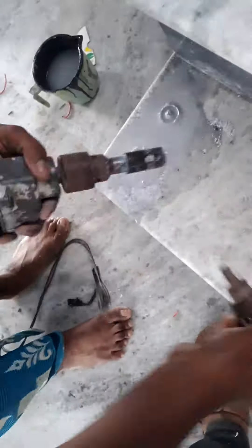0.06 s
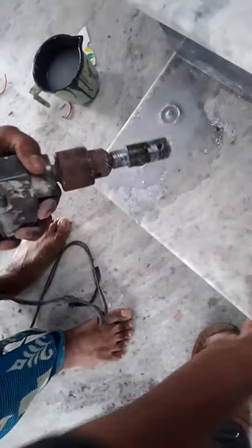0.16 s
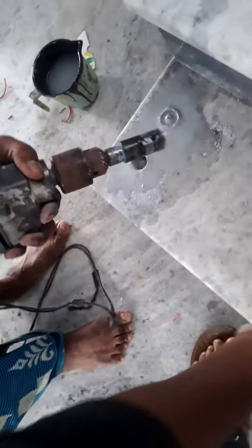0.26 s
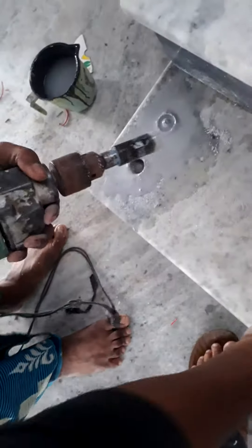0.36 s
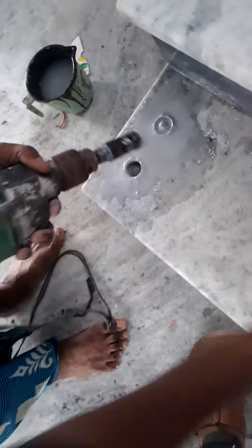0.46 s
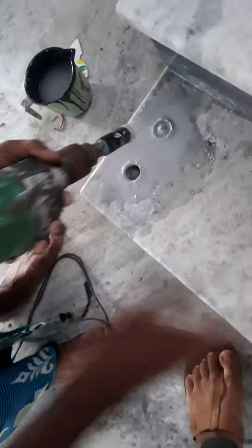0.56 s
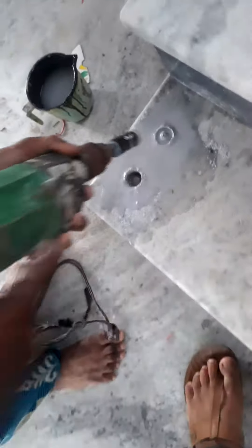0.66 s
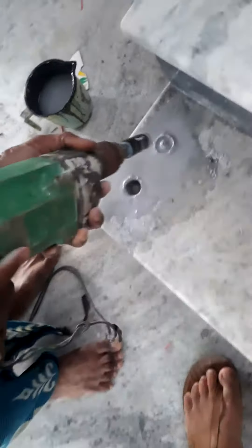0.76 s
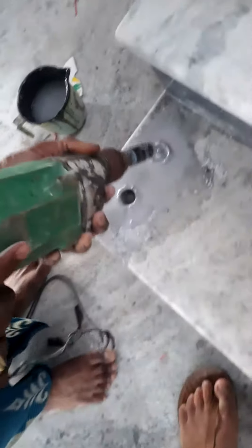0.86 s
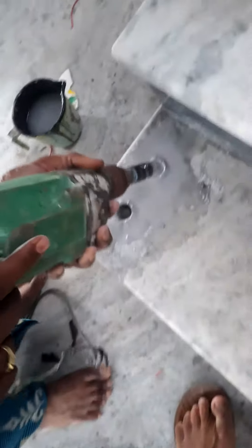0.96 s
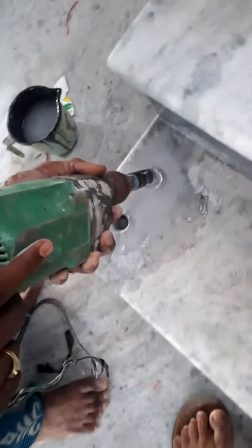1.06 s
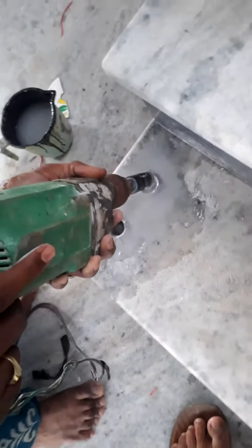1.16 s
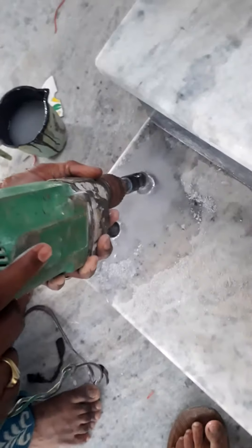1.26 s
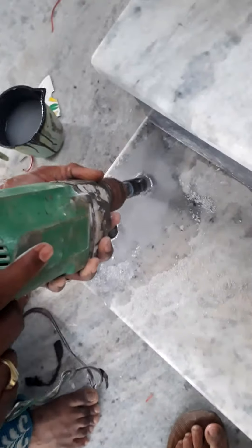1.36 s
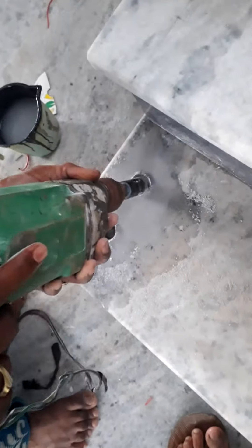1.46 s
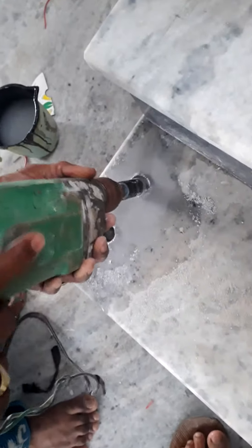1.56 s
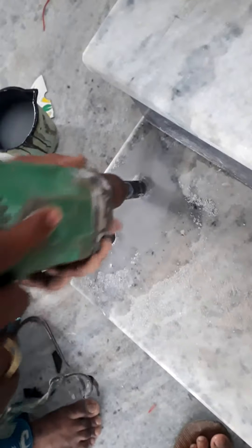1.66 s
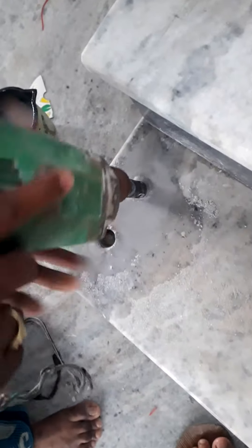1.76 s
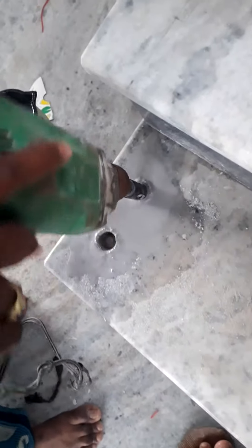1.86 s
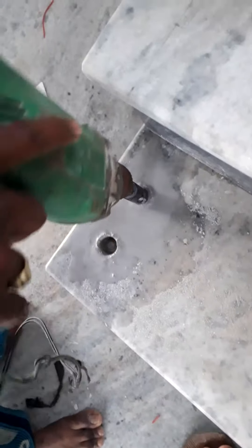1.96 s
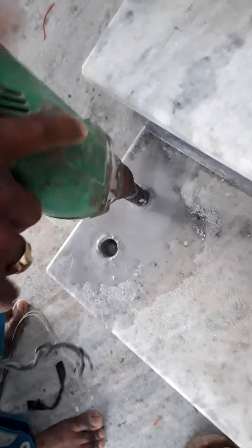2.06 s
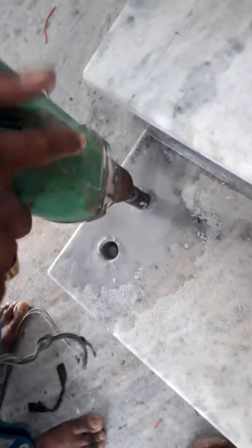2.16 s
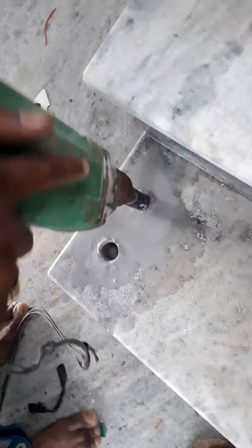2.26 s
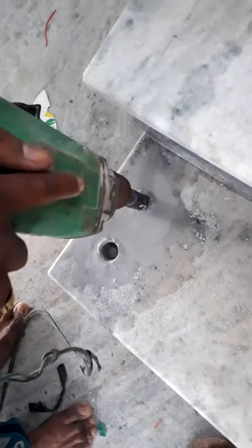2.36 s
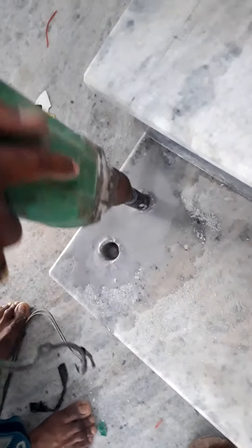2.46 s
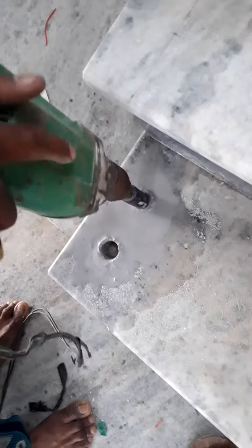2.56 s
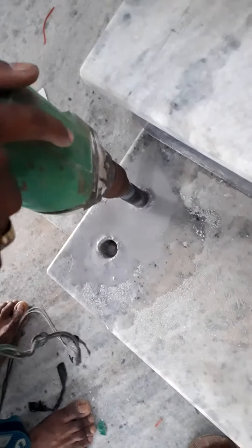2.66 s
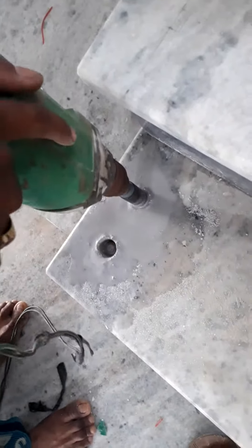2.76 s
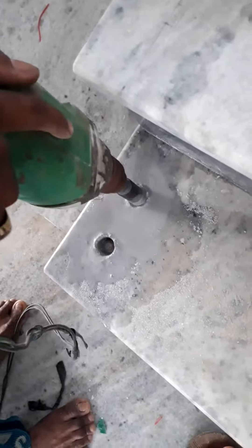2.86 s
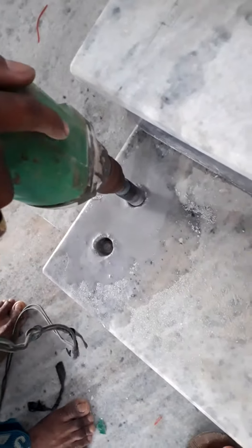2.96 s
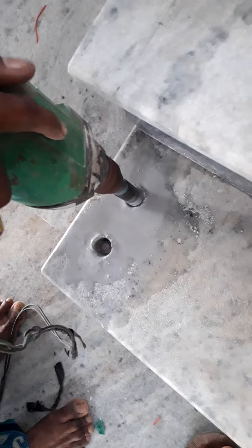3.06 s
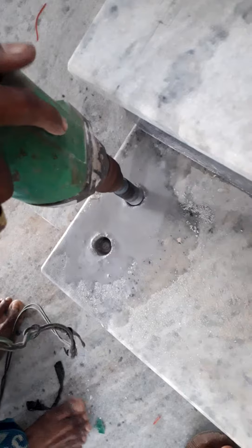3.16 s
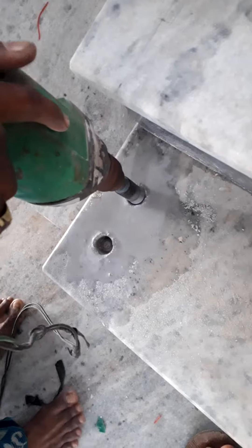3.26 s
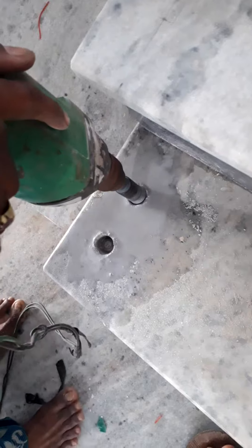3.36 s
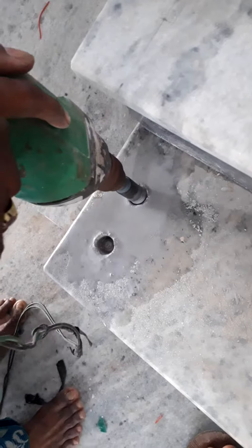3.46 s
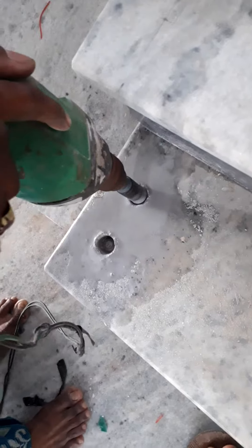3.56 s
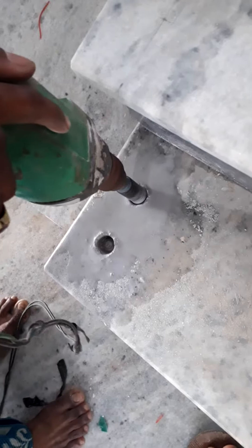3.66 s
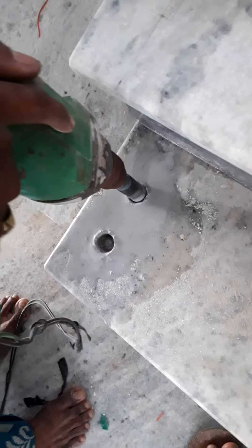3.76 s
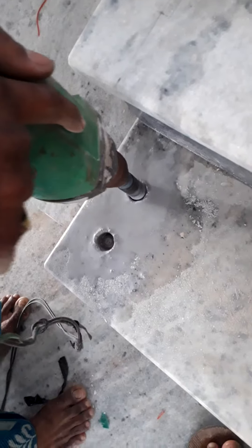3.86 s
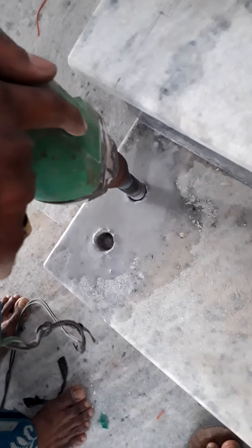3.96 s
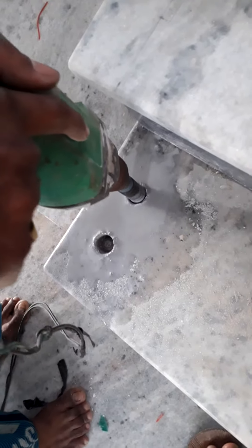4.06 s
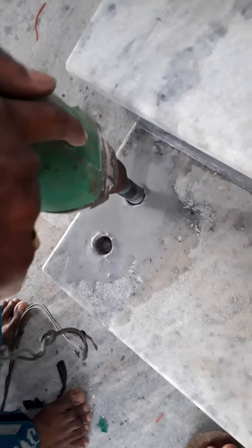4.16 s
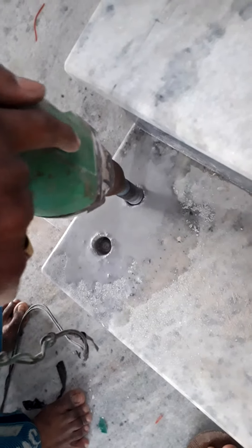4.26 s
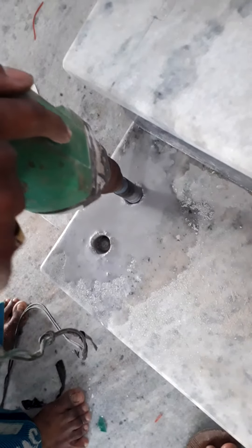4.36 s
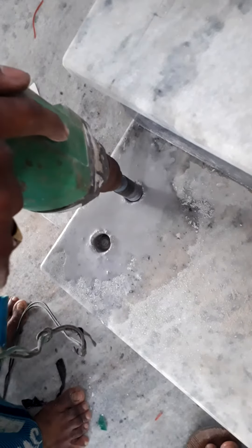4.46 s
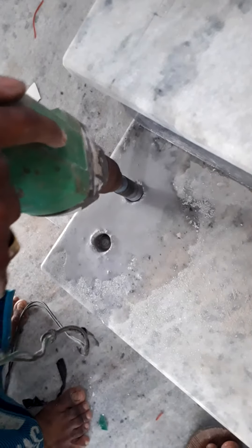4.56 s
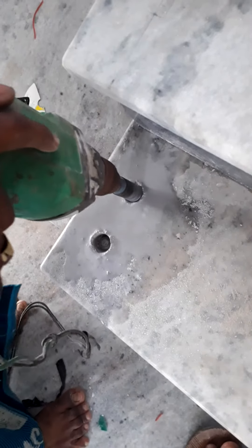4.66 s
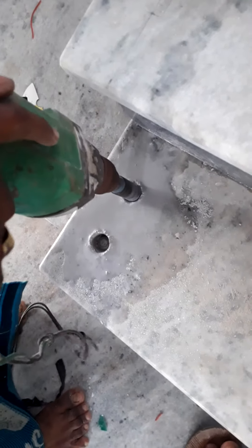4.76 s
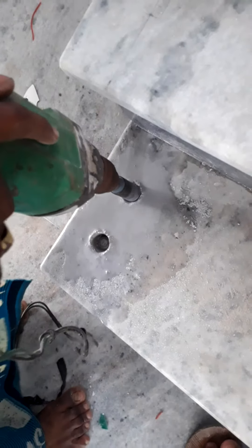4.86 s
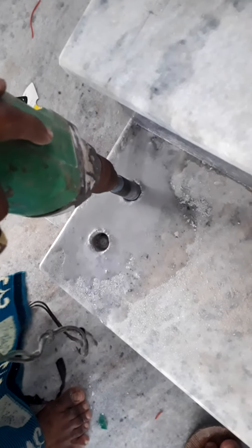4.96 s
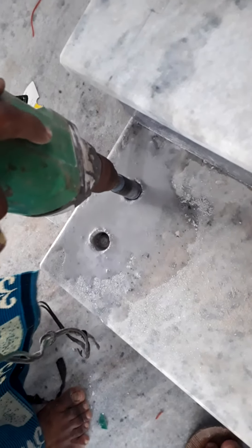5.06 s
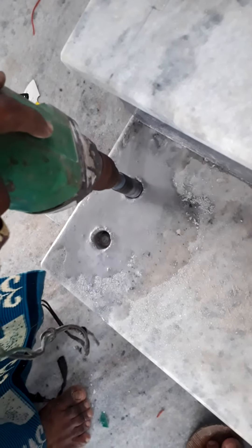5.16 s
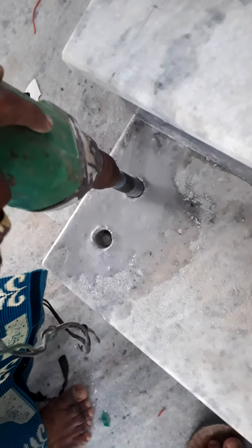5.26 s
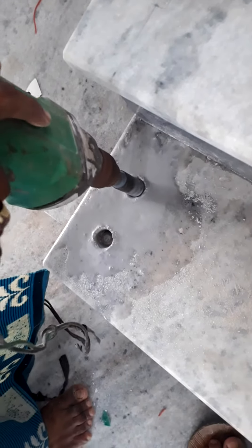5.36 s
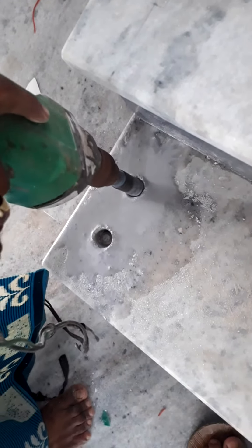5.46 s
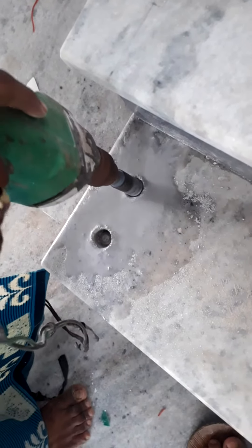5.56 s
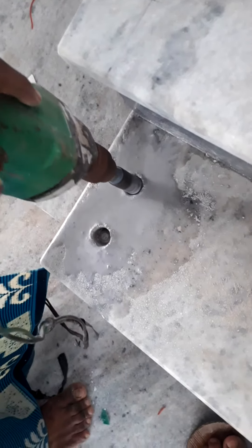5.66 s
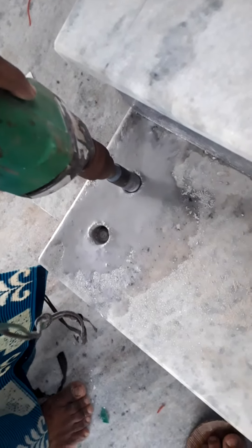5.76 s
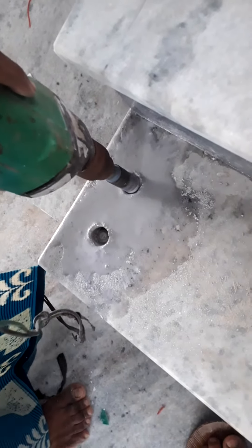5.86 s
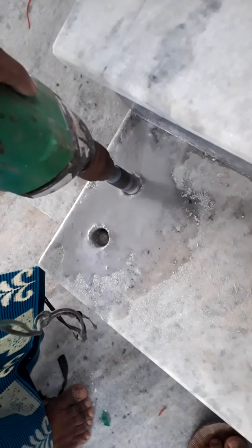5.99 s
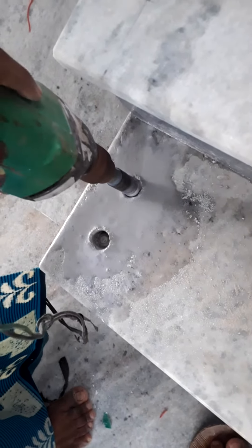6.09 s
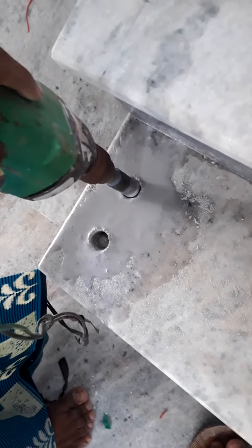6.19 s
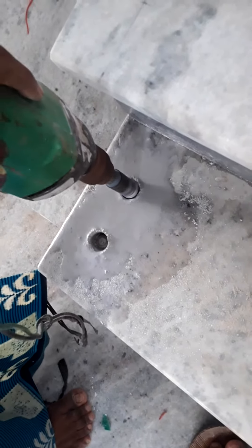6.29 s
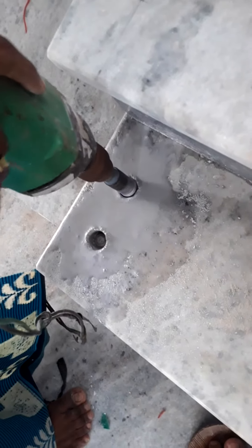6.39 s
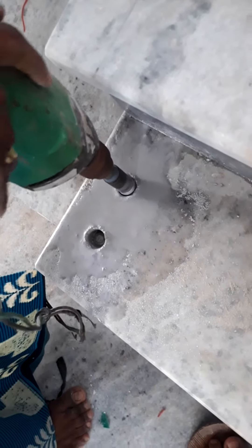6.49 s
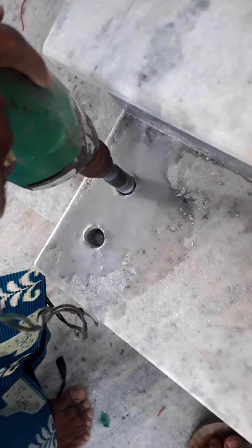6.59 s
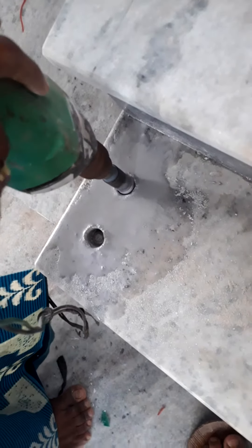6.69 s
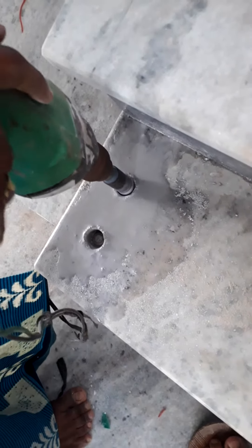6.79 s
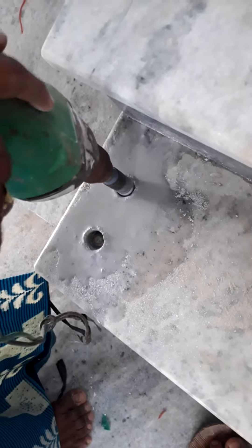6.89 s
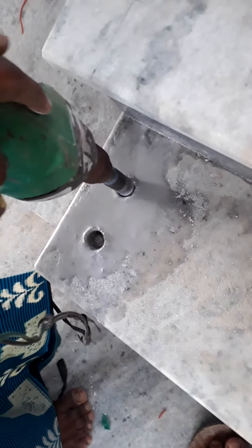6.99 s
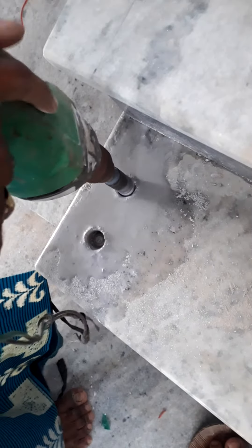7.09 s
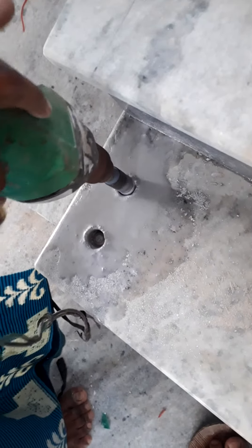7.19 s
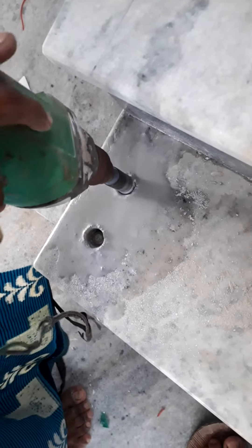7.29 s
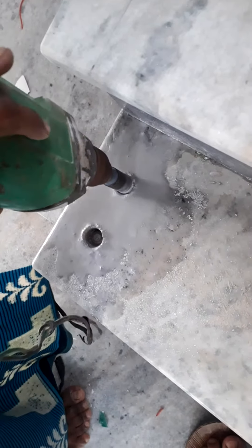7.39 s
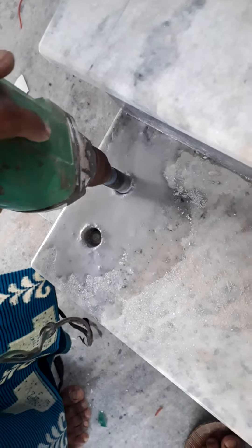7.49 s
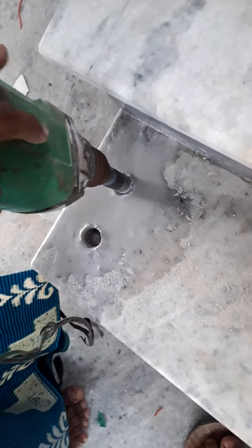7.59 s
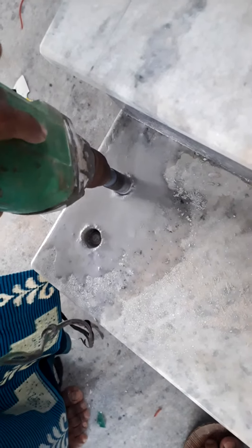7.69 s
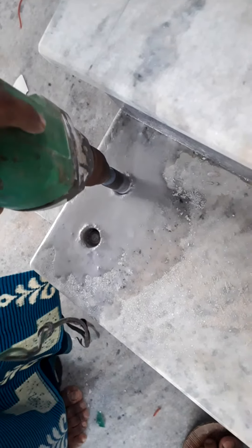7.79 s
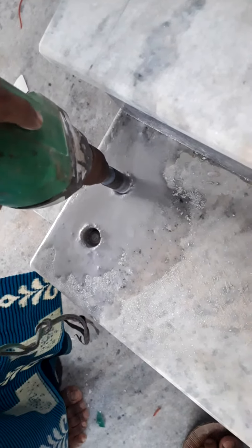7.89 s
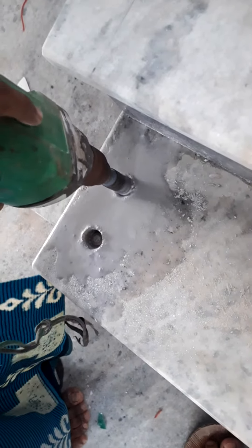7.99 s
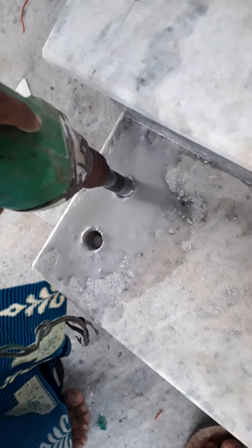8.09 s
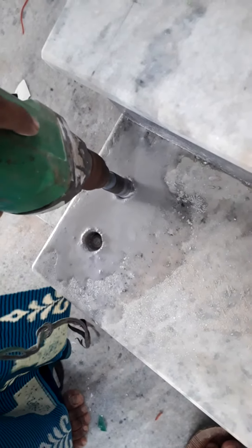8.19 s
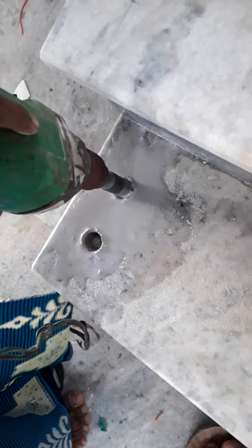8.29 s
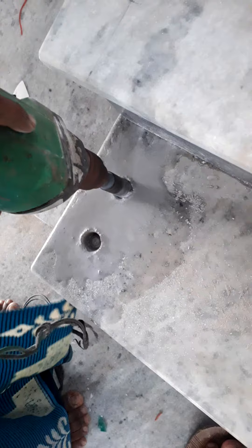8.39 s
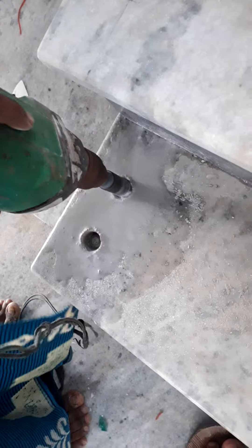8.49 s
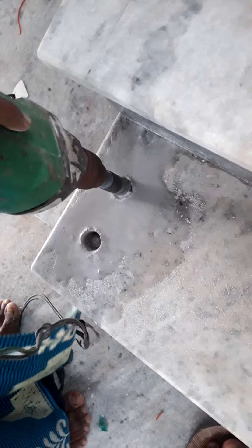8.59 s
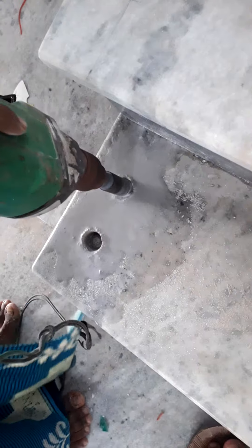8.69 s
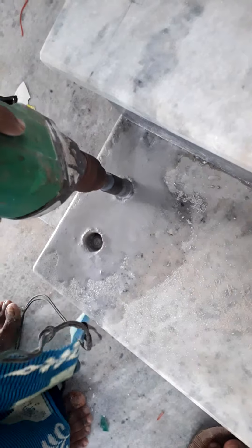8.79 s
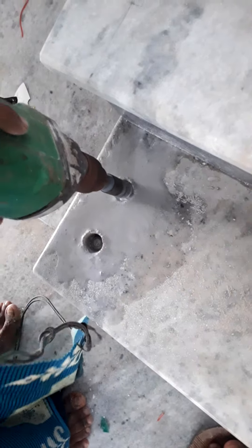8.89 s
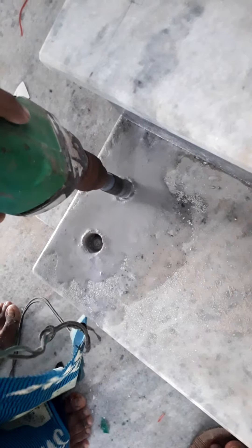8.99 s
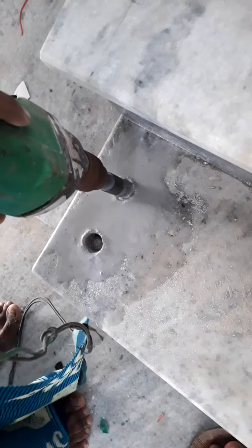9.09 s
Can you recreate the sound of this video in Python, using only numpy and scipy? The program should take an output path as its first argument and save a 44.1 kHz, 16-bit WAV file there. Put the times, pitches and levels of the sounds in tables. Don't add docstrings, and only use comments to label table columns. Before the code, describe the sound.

A close mono microphone in a hard-floored, echoing stone space. At 0 s an earlier echo is fading; a steel tool clinks at about 0.3 s and rings brightly around 0.55 s, with hands scuffing stone and a knock at 0.75 s. After a quieter gap, gritty taps begin at 1.4 s, with a heavy knock at 1.7 s and smaller scrapes until 2.6 s. The drill then surges up in half a second to a high, bright gear whine with roaring housing and hissing brushes. By 4 s its pitch sags under load and the hollow bit chatters rapidly against stone, metallic and rough. Gritty binding pulses and short squeals come at 4.7-5.7 s. The whine wavers, dipping lowest near 6.7 s, while irregular rim catches continue. Stronger squeals and grinding return from 8.6 s, and the drill is still boring at the end, about 9.1 s.

```python
import sys
import numpy as np
from scipy import signal
from scipy.fft import rfft, irfft, next_fast_len
from scipy.io import wavfile
from scipy.ndimage import uniform_filter1d, map_coordinates

SR = 44100
rng = np.random.default_rng(int(sys.argv[2]) if len(sys.argv) > 2 else 0)


def ratio(d):
    e = np.asarray(d, float) / 20
    return 10 ** e


def wav_record(signal):
    frames = np.transpose(np.atleast_2d(signal))
    bounded = np.clip(frames, -1, 1)
    quanta = np.round(bounded * 32767).astype(np.int16)
    wavfile.write(sys.argv[1], SR, quanta)


N = 403074


def unit(x):
    return x / np.sqrt(np.mean(x ** 2) + 1e-20)


def along(points, hz):
    f, v = np.transpose(points)
    return np.interp(np.log(hz + 1), np.log(f + 1), v)


def curves(rows):
    s, *cols = np.transpose(rows)
    return [np.interp(np.arange(N) / SR, s, c) for c in cols]


def wobble(rate):
    knots = rng.standard_normal(int(N * rate / SR) + 4)
    return map_coordinates(knots, [np.arange(N) * rate / SR])


def filtered(x, response):
    m = next_fast_len(len(x) + 8192)
    return irfft(rfft(x, m) * response(np.fft.rfftfreq(m, 1 / SR)), m)[:len(x)]


def modes(rows):
    def response(f):
        total = 0
        for k, (c, w, db) in enumerate(rows):
            total = total + (-1) ** k * ratio(db) * 1j * f * w / (c * c - f * f + 1j * f * w)
        return total
    return response


def highpass(f, hz):
    return (1j * f / (hz + 1j * f)) ** 2


def hiss(spectrum, gate=1):
    return unit(filtered(gate * rng.standard_normal(N), lambda hz: ratio(along(spectrum, hz))))


# frequency in Hz, density in dB per Hz.
ECHO_SPECTRUM = [(180, -54), (300, -10), (412, -14), (448, -17), (652, -6), (962, -2), (1320, -3),
                 (1770, -2), (5000, -16.5), (6500, -29), (11000, -120)]
DUST_SPECTRUM = [(2060, -30), (3500, -5), (4980, 5.5), (5870, -2), (7900, 5), (10400, -14), (13000, -8),
                 (15800, -9)]
AIR_SPECTRUM = [(12, -27), (20, -6), (49, -21), (130, -4.5), (203, -9.5), (524, -18), (1650, -20),
                (5470, -30), (6650, -29), (10700, -40), (15800, -34)]
# middle in seconds, half length in seconds, low
# level in dB, dust level in dB.
RUBS = [
    (0.647, 0.28, -49.5, -57),
    (1.685, 0.022, -50, -68),
    (1.777, 0.24, -56, -61),
    (2.321, 0.26, -55, -53.5),
]
ECHO_DB, ECHO_DUST_DB, ECHO_T60_S, AIR_DB = -35.5, -51, 1.87, -58.5


def background():
    t = np.arange(N) / SR
    fade = ratio(-60 * t / ECHO_T60_S)
    low, high = ratio(ECHO_DB) * fade, ratio(ECHO_DUST_DB) * fade
    for s, half_s, low_db, dust_db in RUBS:
        stroke = np.exp(-((t - s) / half_s) ** 2)
        low = low + ratio(low_db) * stroke
        high = high + ratio(dust_db) * stroke
    scuff = low * ratio(1.5 * wobble(24.5)) * hiss(ECHO_SPECTRUM)
    scuff += high * ratio(1.6 * wobble(24.4)) * hiss(DUST_SPECTRUM)
    return scuff + ratio(AIR_DB) * hiss(AIR_SPECTRUM)


def ringing(rows, t):
    out = 0
    for hz, db, t60_s in rows:
        out = out + ratio(db + rng.normal(0, 0.46) - 60 * t / t60_s) * np.sin(2 * np.pi * hz * t)
    return out * (1 - np.exp(-t / .0005))


# start in seconds, low ring in dB, high ring in dB, crack in dB, crack in Hz.
CLINKS = [
    (.3027, -70, -33, -18, 5260),
    (.4788, -43, -48, -17, 2020),
    (.4983, -50, -52, -20, 2000),
    (.5492, -16, -36, -7.5, 2100),
    (.5896, -18, -38, -19, 1670),
]
# frequency in Hz, level in dB, t60 in seconds.
STEEL_LOW = [(6532, -4.5, 0.31), (6510, -1.5, 0.2), (6512, -15.5, 0.97), (1640, -11, 0.091),
             (13270, -40, .4), (13240, -40, .3)]
STEEL_HIGH = [(11500, -7, 0.32), (11585, -12, 0.22), (15030, -10, 0.25), (15090, -14, 0.2)]


def clinks():
    rings, cracks, t = np.zeros(N), np.zeros(N), np.arange(SR) / SR
    for s, low_db, high_db, crack_db, hz in CLINKS:
        at = slice(round(s * SR), round(s * SR) + SR)
        burst = ratio(-60 * t / 0.051) * rng.standard_normal(SR)
        crack = filtered(burst, modes([(hz, 900, 8), (2600, 2600, -2), (8000, 6000, -4)]))
        cracks[at] += ratio(crack_db) * filtered(crack, lambda f: highpass(f, 850))
        rings[at] += ratio(low_db) * ringing(STEEL_LOW, t) + ratio(high_db) * ringing(STEEL_HIGH, t)
    return rings, cracks


# start in seconds, peak in dB, knock in Hz, scrape in dB.
TAPS = [(0.335, -23, 1840, -14), (0.357, -23.5, 2030, -7), (0.421, -36, 1040, -10), (0.751, -14, 836, -31),
        (1.433, -17.5, 894, -8.5), (1.445, -24, 1650, -10), (1.52, -32.5, 900, 0.5), (1.702, -7, 1504, -7),
        (1.711, -16, 1020, -6), (1.721, -13.5, 1150, -9), (1.872, -24.5, 820, -2), (1.904, -33, 993, -13),
        (2.037, -30, 1710, 0), (2.049, -27.5, 3050, -1), (2.135, -25.5, 836, -9), (2.186, -32, 713, -6),
        (2.265, -28, 800, -5), (2.329, -18.5, 760, -5), (2.376, -27, 714, -3.5), (2.45, -27.5, 720, -5.5),
        (2.536, -23, 760, -10), (2.613, -27, 756, -7)]
KNOCK_DB, KNOCK_T60_S, THUD_DB = -9.5, 0.043, -30.5
HEAVY_S, HEAVY_DB, HUM_T60_S = 1.702, -46.5, 1.6


def taps():
    noisy, dull, t = np.zeros(N), np.zeros(N), np.arange(SR // 4) / SR

    def slab(f):
        return modes([(283, 30, THUD_DB + 27)])(f) + modes([(800, 450, THUD_DB + 33)])(f) ** 2

    for s, db, hz, scrape_db in TAPS:
        at = slice(round(s * SR), round(s * SR) + len(t))
        envelope = ratio(-60 * t / 0.038) * (1 - np.exp(-t / 0.0007))
        burst = envelope * rng.standard_normal((3, len(t)))
        knock = ratio(KNOCK_DB - 60 * t / KNOCK_T60_S) * np.sin(2 * np.pi * hz * t)
        knock *= 1 + 0.42 * filtered(burst[0], modes([(200, 540, 14.0)]))
        scrape = filtered(burst[1], modes([(1750, 340, 4.5), (3340, 1250, 3.0), (7150, 13000, -9.0)]))
        thud = ratio(min(scrape_db + 14, 0)) * filtered(burst[2], slab)
        noisy[at] += ratio(db) * (thud + ratio(scrape_db + 5.5) * scrape)
        dull[at] += ratio(db) * knock
    t = np.arange(SR * 3 // 4) / SR
    hum = filtered(rng.standard_normal(len(t)), lambda f: modes([(260, 260, 0)])(f) ** 2)
    noisy[round(HEAVY_S * SR):][:len(t)] += ratio(HEAVY_DB - 60 * t / HUM_T60_S) * unit(hum)
    return noisy, dull


# frequency in Hz, t60 in seconds.
YARD = [(300, 1.08), (1500, 1.44), (5000, 0.8), (12000, 0.28)]


def yard(x, pieces):
    out, step = np.zeros(N + 2 * SR), len(x) // pieces
    for i in range(0, len(x) - step + 1, step):
        hz, t, z = signal.stft(rng.standard_normal(SR), SR, nperseg=256)
        decay = ratio(-60 * t / along(YARD, hz)[:, None])
        tail = signal.istft(z * decay, SR, nperseg=256)[1]
        wet = signal.fftconvolve(x[i:i + step], tail / np.linalg.norm(tail))
        out[i + 400:][:len(wet)] += wet
    return out[:N]


def switched(s):
    return np.clip((np.arange(N) / SR - s) / 0.0068, 0, 1)


# time in seconds, pinion mesh in Hz.
DRIVE = [(3.1, 2563), (3.58, 2528), (4.0, 2332), (4.27, 2308), (4.55, 2360), (5.0, 2414), (5.3, 2408),
         (5.9, 2322), (6.05, 2288), (6.4, 2244), (6.65, 2178), (6.95, 2205), (7.3, 2335), (7.62, 2290),
         (8.12, 2368), (8.58, 2392), (8.85, 2303), (9.14, 2360)]
START_S, LOADED_HZ, FREE_HZ = 2.6, 2330, 2560
SURGE, SURGE_S, SETTLE_S, INERTIA_S = .35, .05, .19, 0.12


def pinion_speed():
    t = np.arange(N) / SR
    since = np.maximum(t - START_S, 0)
    lag = SURGE * np.exp(-since / SURGE_S) + (1 - SURGE) * np.exp(-since / SETTLE_S)
    mesh_hz = uniform_filter1d(curves(DRIVE)[0], size=int(INERTIA_S * SR))
    mesh_hz = mesh_hz * (1.006 - lag - .006 * (t > 4))
    free = np.clip((mesh_hz - LOADED_HZ) / (FREE_HZ - LOADED_HZ), 0, 1) ** 0.097
    return mesh_hz, free * np.clip((4.1 - t) / 0.39, 0, 1)


def gear_line(turns, k, db, flicker_db):
    phase = k * turns + 0.076 * wobble(30)
    return ratio(db + flicker_db * wobble(22)) * np.sqrt(2) * np.sin(2 * np.pi * phase)


# multiple of mesh, level in dB.
SPIN_UP = [(1, -20), (12 / 7, -19), (2, -26), (3, -21), (6 / 11, -25), (14 / 11, -29)]
# frequency in Hz, width in Hz, level in dB.
GEARBOX = [(900, 450, 0), (1690, 260, 2), (2200, 200, 2), (3100, 550, 1), (4300, 500, -1), (5300, 800, -2),
           (6830, 260, 1)]


def spin_up(turns):
    t = np.arange(N) / SR
    torque = np.clip((3.15 - t) / .3, 0, 1) * np.clip((t - 2.638) / .018, 0, 1)
    torque = torque * (1 + .45 * wobble(600))
    lines = sum(gear_line(turns, k, db + 2.5 * wobble(50), 2) for k, db in SPIN_UP)
    return filtered(torque * lines, lambda f: .12 + sum(modes([row])(f) ** 2 for row in GEARBOX))


# time in seconds, mesh in dB, second stage in dB, fourth overtone in dB.
TEETH = [(2.9, -31, -27, -52), (3.14, -17, -22, -58), (3.28, -28, -26, -58), (3.42, -19.5, -19.5, -55),
         (3.53, -29, -30, -54), (3.62, -19, -25, -57), (3.8, -24, -33, -53), (4.1, -12.5, -32, -46),
         (4.22, -17.5, -23.5, -43), (4.55, -23, -36, -48), (5.35, -30, -39, -50), (5.5, -19.5, -39, -53),
         (5.7, -28, -31, -52), (5.86, -20.5, -40, -47), (6.3, -29.5, -38, -34.5), (6.8, -21.5, -36, -32),
         (7.4, -19.5, -34.5, -48), (8.2, -26, -37, -60), (8.5, -21.5, -42, -53), (8.8, -28, -41, -52)]
# time in seconds, rim bite in dB, rasp in dB, bit ring in Hz.
CUT = [(2.62, -40, -17, 1740), (2.7, -26, 3.5, 1700), (3.05, -27, 4.5, 1750), (3.7, -27, -0.5, 1760),
       (4.12, -16, 0, 1810), (4.4, -17, -1, 1741), (4.75, -17, 2, 1750), (5.18, -24, 4, 1753),
       (5.82, -19, 0, 1695), (5.95, -16, -0.5, 1670), (6.1, -26, -2, 1720), (6.7, -20, -3, 1773),
       (7.1, -22.5, -2, 1743), (7.68, -27, 0, 1741), (8.38, -19.5, -0.5, 1852), (8.56, -20, 0.5, 1758),
       (8.72, -23, 2.5, 1699), (9.14, -19, 1, 1764)]
# multiple of mesh, level in dB.
MESH_DB = [(5, -48), (6, -50)]
# order, level in dB.
ROTOR_DB = [(12, -35), (22, -40), (23, -39), (24, -39), (25, -45), (26, -45), (27, -46), (30, -57),
            (33, -53), (37, -53), (38, -56), (39, -52)]
# multiple of mesh, dB re the
STAGE_DB = [(9 / 11, -16), (8 / 7, -7), (14 / 11, 3), (17 / 11, -5)]
PINION, STAGE = 7, 3 / 11
SECOND_DB, THIRD_DB, THIRD_FREE_DB = -33, -30, 7
STAGE_LINE_DB, STAGE_FREE_DB, STAGE_FADE_S = -38, 10.5, 0.85
UNBALANCE_DB, UNBALANCE_FREE_DB = -57.5, 10.5
CONTACT_S = 3.3
SHAKEN = -1.1
BITE_IN_DB, BITE_IN_S = 6, .9
SAG_HZ, SAG_DB = 2280, -22.5


def gears():
    t = np.arange(N) / SR
    mesh_hz, free = pinion_speed()
    mesh_db, second_db, fourth_db = curves(TEETH)
    turns = np.cumsum(mesh_hz * (1 + 0.000968 * wobble(40))) / SR

    def line(k, db, flicker_db):
        return gear_line(turns, k, db, flicker_db)

    slow_db = np.minimum(42 * np.log10(mesh_hz / 2200), 0)
    speed_db = np.minimum(90 * np.log10(mesh_hz / 2300), 0)
    unseated_db = -6 * np.clip((3.09 - t) / .06, 0, 1)
    out = line(1, mesh_db + slow_db + unseated_db, 1.9 + 3 * (t < 3.08))
    third_db = THIRD_DB + THIRD_FREE_DB * free + 3.4 * slow_db + unseated_db
    out += line(3, third_db + 0.67 * wobble(4.5) + (1 + 2 * free) * wobble(150), 2.3)
    out += line(2 * STAGE, second_db + slow_db, 2.7)
    out += line(4, fourth_db + slow_db, 2.4)
    out += line(STAGE, -36.5 + speed_db, 0.6)
    out += line(2, SECOND_DB - 3 * (t < 6.2) + speed_db + 1.5 * wobble(3), 2)
    unbalance_db = UNBALANCE_DB + UNBALANCE_FREE_DB * free + slow_db
    out += line(1 / PINION, unbalance_db + 0.77 * wobble(1.9), 3.6)
    out += np.clip((SAG_HZ - mesh_hz) / 80, 0, 1) * (t > CONTACT_S) * line(3 * STAGE, SAG_DB, 2.2)

    pressed_db = -9 * np.clip((3.95 - t) / 0.34, 0, 1) + SHAKEN * (curves(CUT)[1] + 2) * (t > CONTACT_S)
    pressed_db += BITE_IN_DB * np.exp(-np.abs(t - 4) / BITE_IN_S) * (t > 3.8)
    for k, db in MESH_DB:
        out += line(k, db + speed_db + pressed_db + 2 * wobble(2.5), 2.5)
    for k, db in ROTOR_DB:
        out += line(k / PINION, db + speed_db + (k > 25) * pressed_db + 2 * wobble(2.5), 2.5)

    stage_db = STAGE_LINE_DB + STAGE_FREE_DB * np.exp(-np.maximum(t - CONTACT_S, 0) / STAGE_FADE_S)
    stage_db = uniform_filter1d(stage_db + 3.9 * slow_db + 0.77 * wobble(3.3), size=SR)
    for k, db in STAGE_DB:
        out += line(k, stage_db + db + speed_db, 0.41)
    return out + spin_up(turns), turns, free


# frequency in Hz, density in dB per Hz.
HOUSING = [(18, -82), (30, -43.5), (490, -19.5), (598, -9.5), (798, -15.5), (912, -10), (1140, -12.5),
           (1770, -1.5), (2020, -4.5), (2260, -6), (2700, -12.5), (3370, -7.5), (6000, -21.5), (7800, -50),
           (13200, -120)]
BRUSH = [(2650, -25), (4500, -39), (4600, -4), (5090, -2), (6210, -8), (7160, 0.5), (7340, 2), (7710, 5.5),
         (9180, -20.5), (10500, -56), (13600, -52), (22000, -120)]
# frequency in Hz, width in Hz, dB over the rest.
SHELL = [(697, 47, 11), (960, 90, 10.5), (345, 93, -8.5), (2940, 64, -13)]
HOUSING_DB, HOUSING_FREE_DB, HOUSING_FOLLOWS = -26, -0.5, -0.053
KICK_DB, KICK_S = 3.5, 0.99
BRUSH_DB, BRUSH_FREE_DB, BRUSH_FOLLOWS = -22.5, 6.5, 0.68


def motor(turns, free):
    t = np.arange(N) / SR
    since = np.maximum(t - START_S, 0)
    rasp_db = curves(CUT)[1]
    housing_db = HOUSING_DB + HOUSING_FREE_DB * free + KICK_DB * np.exp(-since / KICK_S)
    housing_db += HOUSING_FOLLOWS * np.maximum(rasp_db, -6)
    brush_db = BRUSH_DB + BRUSH_FOLLOWS * rasp_db
    brush_db += BRUSH_FREE_DB * np.maximum(free, np.exp(-since / 0.88))
    shell = modes(SHELL)
    body = unit(filtered(hiss(HOUSING, ratio(1.02 * wobble(60))), lambda hz: 1 + np.abs(shell(hz))))
    spark = 1 + 0.26 * np.sin(2 * np.pi * turns / PINION)
    spark *= 1 + 0.16 * np.sin(2 * np.pi * 100 * t)
    roar = ratio(housing_db + 4.5 + wobble(12)) * body
    return roar + ratio(brush_db - 5.5 + 0.81 * wobble(15)) * hiss(BRUSH, spark)


def squeak(hz, spread_hz, wander_hz):
    narrow = filtered(rng.standard_normal(N), lambda f: 1 / (1 + (f / spread_hz) ** 2))
    turns = np.cumsum(hz + wander_hz * wobble(50)) / SR
    return unit((1.8 + unit(narrow)) * np.sin(2 * np.pi * turns))


CHUCK, SEGMENTS = 3 / 11 / 38, 5
TICK_SCATTER_DB, TICK_SPREAD = 2.5, .022


def chatter(turns, ring_hz):
    passes = SEGMENTS * turns * CHUCK + .22 * wobble(25)
    size, pitch = rng.standard_normal((1000, 2))[np.abs(passes).astype(int)].T
    tick = .15 + np.sin(np.pi * passes) ** 2
    tick *= ratio(TICK_SCATTER_DB * size + 1.8 * wobble(11))
    return unit(tick * squeak(ring_hz * (1 + TICK_SPREAD * pitch), 80, 15))


# start in seconds, length in seconds, level in dB, from Hz, to Hz.
BENDS = [
    (5.06, 1.2, -28.5, 1289, 1500),
    (8.581, .8, -23, 1470, 1334),
]
BEND_EDGE_S = 0.14


def shank():
    out, t = np.zeros(N), np.arange(N) / SR
    for s, length_s, db, from_hz, to_hz in BENDS:
        end_s = s + length_s
        held = np.clip(np.minimum(t - s, end_s - t) / BEND_EDGE_S, 0, 1)
        slide_hz = np.interp(t, [s, end_s], [from_hz, to_hz])
        out += held * ratio(db + 0.85 * wobble(45)) * squeak(slide_hz, 110, 39.95)
    return out


# time in seconds, peak in dB, ring in Hz.
BITES = [(4.183, -11, 1730.0), (4.212, -7, 1800), (4.224, -9, 1750.0), (4.247, -2, 1750),
         (4.269, -10, 1700), (4.285, -10, 1700.0), (4.313, -3.5, 1770), (4.334, -6, 1750.0),
         (4.349, -7, 1780), (4.379, -4, 1700), (4.4, -10, 1760.0), (4.455, -6, 1765), (4.467, -6, 1750),
         (4.489, -12, 1730), (4.548, -5.5, 1750.0), (4.577, -10, 1750.0), (4.61, -9, 1780.0),
         (4.624, -7, 1804), (4.637, -10, 1750.0), (4.649, -3.5, 1780), (4.676, -6, 1750.0),
         (4.688, -8, 1710), (4.704, -6, 1800.0), (4.73, -10, 1750.0), (4.767, -4, 1764),
         (4.785, -10, 1790.0), (4.812, -8, 1690), (4.862, -10, 1800.0), (4.876, -10, 1750.0),
         (4.905, -10, 1780.0), (4.925, -12, 1770.0), (4.941, -8, 1740), (4.976, -4, 1695),
         (5.038, -6, 1740.0), (5.064, -12, 1720), (5.09, -8, 1740.0), (5.153, -15, 1750.0),
         (5.428, -9, 1730.0), (5.487, -8, 1750.0), (5.519, -13, 1740), (5.545, -13, 1780.0),
         (5.565, -9, 1650), (5.729, -6, 1730), (5.759, -6, 1695), (5.795, -10, 1730.0), (5.879, -8, 1680),
         (5.908, -6, 1725), (5.922, -8, 1690), (5.942, -5, 1685), (5.96, -5, 1690), (5.981, -7, 1640.0),
         (5.998, -6, 1670.0), (6.036, -7, 1700.0), (6.114, -7, 1660), (6.158, -6, 1780),
         (6.18, -2.5, 1700.0), (6.22, -7, 1776), (6.242, -4, 1737), (6.279, -8.5, 1690), (6.301, -10, 1660),
         (6.337, -10, 1760.0), (6.363, -10, 1740.0), (6.402, -12, 1756), (6.531, -10, 1780.0),
              (6.578, -12, 1770), (6.594, -9.5, 1770), (6.617, -7, 1770.0), (6.644, -9, 1780.0),
              (6.66, -4, 1740.0), (6.684, -11, 1770), (6.71, -2, 1760.0), (6.729, -1, 1764),
              (6.749, -2, 1764), (6.772, -12, 1780.0), (6.791, -7, 1780), (6.88, -2, 1750.0),
              (6.906, -10, 1816), (6.921, -7, 1776), (6.944, -2, 1736), (6.981, -11, 1750.0),
              (7.004, -6, 1750.0), (7.198, -4.5, 1676), (7.209, -6, 1750.0), (7.221, -4, 1670),
              (7.235, -8, 1770.0), (7.253, -8, 1730.0), (7.353, -5.5, 1710.0), (7.376, -5, 1770),
              (7.416, -7, 1784), (7.437, -3, 1725), (7.494, -11, 1800.0), (7.621, -2.5, 1690),
              (7.646, -12, 1820.0), (7.683, -0.5, 1750.0), (7.742, -6, 1640.0), (7.797, -13, 1780.0),
              (7.836, -9, 1785), (7.861, -6.5, 1820.0), (7.922, -3, 1750.0), (7.982, -3, 1743),
              (8.057, -4, 1910), (8.071, -8, 2020), (8.1, -3, 1750.0), (8.162, -0.5, 1730.0),
              (8.278, -3, 1820.0), (8.397, -8, 1840), (8.425, -9, 1770.0), (8.456, -4.5, 1807),
              (8.482, -7, 1780.0), (8.56, -8, 1730), (8.613, -7, 1725), (8.635, -5, 1730),
              (8.654, -7, 1750), (8.683, -7, 1750.0), (8.708, -12, 1730), (8.738, -5.5, 1740),
              (8.759, -7, 1690.0), (8.876, -8, 1780.0), (9.058, -11, 1740.0), (9.089, -12, 1720)]
# time in seconds, peak in dB, squeal in Hz.
GRABS = [(4.7174, -22, 3950), (4.878, -24, 4480), (4.939, -32, 4077), (4.9946, -17.5, 4110),
         (5.049, -22, 4096), (5.1046, -19.5, 3850), (5.1583, -18, 3970), (5.2197, -24, 3830),
         (5.2716, -22, 3803), (5.3048, -22, 3900), (5.334, -19, 4040), (5.4028, -19.5, 4270),
         (5.4638, -17, 4040), (5.5294, -34, 4284), (5.634, -17, 4200), (5.7, -21, 4007), (7.618, -24, 3944),
         (8.664, -17.5, 4070), (8.697, -14, 4447), (8.7659, -15, 4320), (8.8263, -17.5, 4170),
         (8.848, -22, 4300), (8.8772, -19.5, 4460), (8.954, -13, 4160), (9.0293, -22, 4040)]
# frequency in Hz, width in Hz, level in dB.
SLAB = [(1355, 380, -2), (2900, 830, 0.5), (3373, 265, 3.5), (4200, 730, -1.5), (5990, 1680, -4.5),
        (6950, 810, -0.5), (8280, 500, -4.5)]
# frequency in Hz, density in dB per Hz.
GRIT = [(5000, -33), (8500, 5.5), (10400, -11.5), (12300, -5), (14000, -6.5), (15800, -5.5)]
GRIND_DB, GRIT_DB, GRIT_FOLLOWS = -19.5, -36, 0.68
SQUEAL_DB, LEAD_S = 2, .003
SQUEAL_LOW_HZ, SQUEAL_LOW_DB, DEEP_S = 2947, -4, 8.5
CRACKLE_DB = 3.5


def cutting(turns):
    chatter_db, rasp_db, ring_hz = curves(CUT)
    touching = np.clip((np.arange(N) / SR - 3.95) / .25, .2, 1)
    out = touching * ratio(chatter_db - 3.5) * chatter(turns, ring_hz)
    t = np.arange(SR // 20) / SR
    bite = (t / 0.0042 * np.exp(1 - t / 0.0039)) ** 2
    for s, db, hz in BITES:
        at = out[round((s - LEAD_S) * SR):][:len(t)]
        ring = ratio(db - 1.5) * np.sin(2 * np.pi * hz * t[:len(at)])
        at += bite[:len(at)] * (ring - at)
    out += shank()

    bind, shape = np.zeros(N), (t / 0.0073) * np.exp(1 - t / 0.0072)
    for s, db, hz in GRABS:
        s -= LEAD_S
        at, deep = slice(round(s * SR), round(s * SR) + len(t)), s > DEEP_S
        bind[at] += ratio(db - 14.0 - 1.4 * deep) * shape
        squeal = np.sin(2 * np.pi * hz * t)
        squeal += deep * ratio(SQUEAL_LOW_DB) * np.sin(2 * np.pi * SQUEAL_LOW_HZ * t)
        out[at] += ratio(db + SQUEAL_DB) * shape ** 2 * squeal

    grains = rng.standard_normal(N) * ratio(2.35 * wobble(300))
    grind = unit(filtered(grains, lambda f: modes(SLAB)(f) * highpass(f, 700)))
    steady = ratio(GRIND_DB + rasp_db - 2.0 + 0.57 * wobble(30))
    crackle = ratio(13 + CRACKLE_DB * wobble(500)) * bind
    grit = ratio(GRIT_DB + GRIT_FOLLOWS * rasp_db + 4.5 + 1.1 * wobble(30))
    return out + (steady + crackle) * grind + (grit + bind) * hiss(GRIT)


# frequency in Hz, gain in dB.
PORT = [(150, -7), (280, 2), (600, -2.5), (7500, -5), (9000, -18), (10400, -38), (12500, -24), (15500, -13)]
NEAR_S, NEAR_ROOM_DB = 1.2, -8


def scene():
    rings, cracks = clinks()
    noisy, dull = taps()
    knocks, dull = [filtered(v, lambda hz: ratio(along(PORT, hz))) for v in (cracks + noisy, dull)]
    whine, turns, free = gears()
    drill = switched(2.622) * (whine + motor(turns, free) + cutting(turns))
    near = np.arange(N) / SR > NEAR_S
    thrown = ratio(-1.0) * rings + knocks + ratio(NEAR_ROOM_DB * near) * dull
    mono = background() + rings + knocks + dull + drill
    mono += ratio(-8.5) * yard(thrown[:int(2.7 * SR)], pieces=150)
    mono += ratio(-10) * yard(drill, pieces=12)
    return np.array([mono, mono])


def band_limit(x):
    return signal.sosfilt(signal.butter(12, 16850, fs=SR, output="sos"), x)


# frequency in Hz, gain in dB.
CAPSULE = [(20, -24), (60, -4), (120, 0), (15700, 0), (15850, -60)]
CEILING = .955


def record(dry):
    limited = dry[0] / (1 + np.abs(dry[0] / CEILING) ** 6) ** (1 / 6)
    mono = filtered(limited, lambda hz: ratio(along(CAPSULE, hz)))
    return band_limit(np.array([mono, mono]))


dry = scene()
out = record(dry)
wav_record(out)
```